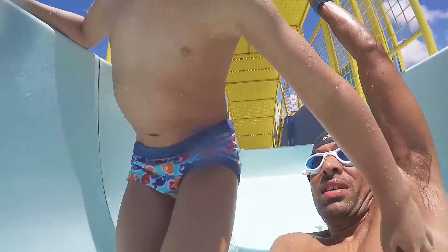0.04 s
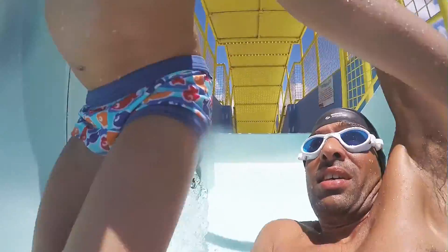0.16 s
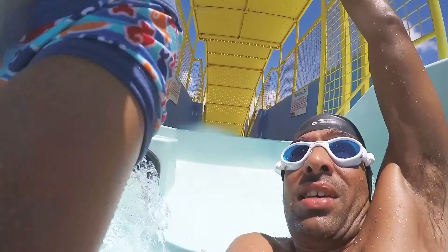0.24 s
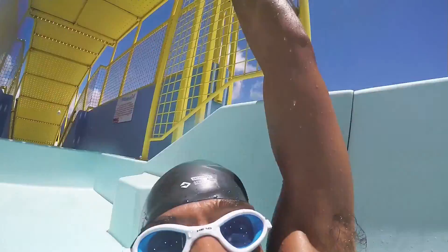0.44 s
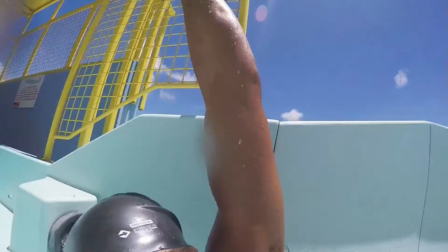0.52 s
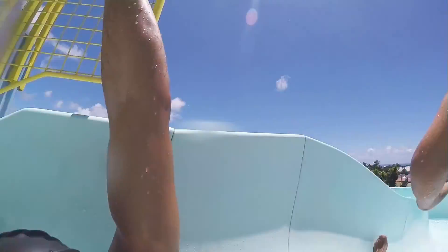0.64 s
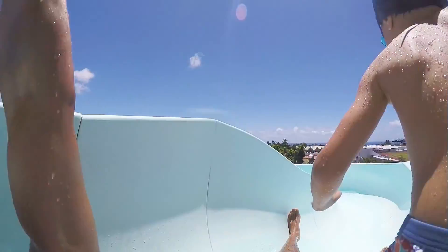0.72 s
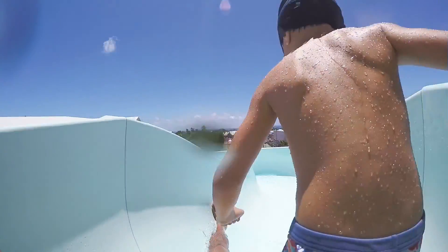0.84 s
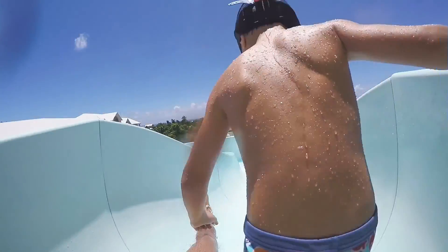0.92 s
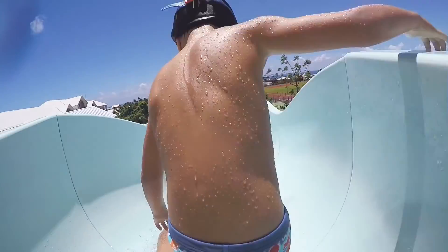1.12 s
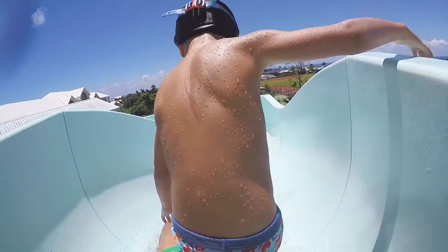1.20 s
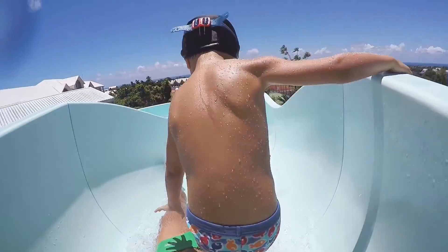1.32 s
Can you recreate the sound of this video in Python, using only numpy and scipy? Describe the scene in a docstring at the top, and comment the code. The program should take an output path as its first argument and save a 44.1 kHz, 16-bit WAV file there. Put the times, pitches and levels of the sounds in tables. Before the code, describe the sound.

Water gushes down an outdoor plastic slide, close to a carried microphone. From 0 s, spray hisses and patters over soft low rumble and small jolts. Around 0.3 s one deep, dull thump lands. The bubbling stream then comes forward, with rapid mid-pitched plops, strongest near 0.75 s, and a churning swell around 0.6-1.0 s. Small splashes and gurgles continue as it eases until about 1.35 s.

```python
"""Water gushes from a pipe down an open plastic slide, heard from a camera carried by a rider.
First spray and fizz from the inlet: random drop clicks, ringing bubbles and noise, over filtered-noise air rumble.
Swept-sine jolts shake the camera, with one deep thump early on; then, as it turns down the chute,
the stream comes forward: a cloud of ringing bubbles, with close plops, small splashes and gurgles,
and a churn of like bubbles that swells and fades."""
import sys
import numpy as np
from scipy import signal
from scipy.fft import rfft, irfft, next_fast_len
from scipy.io import wavfile

SR = 44100
rng = np.random.default_rng(int(sys.argv[2]) if len(sys.argv) > 2 else 0)


def digitize_waveform(pressure):
    """Quantize a signal to 16-bit integers and store it at the path in sys.argv[1].

    Rows of a 2-D input are taken as channels; values are limited to [-1, 1].
    """
    field = np.atleast_2d(pressure).T
    bounded = np.clip(field, -1, 1)
    quanta = np.round(bounded * 32767).astype(np.int16)
    wavfile.write(sys.argv[1], SR, quanta)


N = 59535


def undb(db):
    """Decibels to gain."""
    return 10 ** (np.asarray(db) / 20)


def unit(x):
    """Scale to rms 1."""
    return x / np.sqrt(np.mean(x ** 2))


def curve(rows):
    """Gain over time from (time [s], level [dB]) rows."""
    time_s, level_db = np.array(rows).T
    return undb(np.interp(np.arange(N) / SR, time_s, level_db))


def colour(x, rows):
    """Minimum-phase filter through (frequency [Hz], gain [dB]) rows; output rms 1."""
    hz, db = np.array(rows).T
    size = 2 * next_fast_len(N)
    bin_hz = np.maximum(np.arange(size // 2 + 1) * SR / size, 1)
    log_gain = np.log(undb(np.interp(np.log(bin_hz), np.log(hz), db)))
    # fold the cepstrum onto positive time: causal response
    cepstrum = irfft(log_gain)
    cepstrum[1:size // 2] *= 2
    cepstrum[size // 2 + 1:] = 0
    response = np.exp(rfft(cepstrum))
    return unit(irfft(rfft(x, size) * response)[:N])


def scaled(rows, centre_hz):
    """Spectrum rows with frequency multiples turned into Hz."""
    return [(multiple * centre_hz, db) for multiple, db in rows]


def walk(rate_hz):
    """Random line through `rate_hz` new values a second; rms 1."""
    return unit(np.interp(np.arange(N) / SR * rate_hz, np.arange(N), rng.standard_normal(N)))


def burst(start_s, length_s):
    """Envelope from `start_s`, peaking at 1 after half of `length_s`, then dying away."""
    u = np.maximum(np.arange(N) / SR - start_s, 0) / (length_s / 2)
    return u ** 2 * np.exp(2 * (1 - u))


def sizes(chance, spread_db):
    """Grain gains from uniform chance: many small, a few large."""
    return undb(-spread_db * np.log(np.maximum(chance, .02)))


def bubbles(rate_per_s, lo_hz, hi_hz, cycles, spread_db, glide=0.0046):
    """Cloud of decaying rings, each rising in pitch; roughly even in energy over frequency."""
    out = np.zeros(N)
    for when, pitch, size in rng.random((int(rate_per_s * N / SR), 3)):
        hz = lo_hz + (hi_hz - lo_hz) * pitch ** 2
        i = int(when * N)
        length = min(int(np.log(100) * cycles * SR / hz), N - i)  # down to -40 dB
        turns = np.arange(length) * hz / SR
        ring = np.exp(-turns / cycles) * np.sin(2 * np.pi * turns * (1 + glide * turns / cycles))
        out[i:i + length] += hz ** .75 * sizes(size, spread_db) * ring
    return unit(out)


# inlet spray filter: (frequency [Hz], gain [dB])
GUSH_SPECTRUM = [(88, -47), (150, -9), (257, -2), (343, -7), (535, -1.5), (601, -7), (728, -9), (818, -12),
                 (991, -3), (1670, -8.5), (2450, 1.5), (3150, -4.5), (3600, -2), (4050, -8), (5300, -2.5),
                 (6060, -16.5), (7640, -13.5), (9270, -21), (15000, -31)]
# inlet spray: (time [s], level [dB])
GUSH_LEVEL = [(0, -35), (.06, -40.5), (.15, -36.5), (.28, -38.5), (.335, -36.5), (.38, -39), (.55, -41),
              (.75, -41), (1.0, -40.5), (1.35, -41.5)]
DROPS_PER_S, DROP_SPREAD_DB = 6000, 2.5
FIZZ_DB, GUSH_WASH_DB = -4, -3.5  # relative to drops
GUSH_FLUTTER_DB = 1.0  # rms


def gush():
    """The jet breaks into drops that patter on the plastic, with fizz and a wash of spray."""
    hit, size = rng.random((2, N))
    signs = rng.choice([-1, 1], N)
    drops = unit((hit < DROPS_PER_S / SR) * sizes(size, DROP_SPREAD_DB) * signs)
    fizz = bubbles(5000, lo_hz=1505.0, hi_hz=14155, cycles=16.7, spread_db=3.5)
    wash = rng.standard_normal(N)
    spray = drops + undb(FIZZ_DB) * fizz + undb(GUSH_WASH_DB) * wash
    flutter = undb(GUSH_FLUTTER_DB * walk(60.47))
    return colour(spray, GUSH_SPECTRUM) * curve(GUSH_LEVEL) * flutter


# chute stream filter: (frequency [Hz], gain [dB])
STREAM_SPECTRUM = [(150, -18), (300, -22.5), (500, -17), (750, -12), (1100, -9), (1400, -4.5), (1600, -8.5),
                   (1880, -0.5), (2080, -4.5), (2350, -5), (2850, -22), (3400, -10.5), (3900, -8.5),
                   (4250, -21.5), (4650, -11.5), (5300, -35), (5900, -21), (7200, -22), (8500, -32),
                   (9600, -27), (11500, -37), (15000, -28)]
# chute stream: (time [s], level [dB])
STREAM_LEVEL = [(0, -42.5), (.26, -44), (.33, -36.5), (.42, -37.5), (.52, -37.5), (.6, -37), (.73, -37),
                (.78, -37), (.81, -34.5), (.845, -40.5), (.88, -35.5), (.98, -37.5), (1.07, -39),
                (1.125, -34.5), (1.18, -38), (1.22, -37), (1.35, -39.5)]
BUBBLES_PER_S, BUBBLE_SPREAD_DB, BUBBLE_CYCLES = 4500, 1, 5.8
STREAM_WASH_DB = -7  # relative to bubbles
STREAM_FLUTTER_DB = 0.18  # rms


def stream():
    """Water tumbles down the chute and folds air into ringing bubbles, over a noise wash."""
    cloud = bubbles(BUBBLES_PER_S, lo_hz=350.8, hi_hz=13165, cycles=BUBBLE_CYCLES,
                    spread_db=BUBBLE_SPREAD_DB)
    water = cloud + undb(STREAM_WASH_DB) * rng.standard_normal(N)
    flutter = undb(STREAM_FLUTTER_DB * walk(51.1))
    return colour(water, STREAM_SPECTRUM) * curve(STREAM_LEVEL) * flutter


# close bubbles: (start [s], starting pitch [Hz], envelope peak [dB], decay [s])
PLOPS = [(.3165, 2420, -27, 0.00099), (.3378, 2580, -25.5, 0.0012), (.3869, 1700, -25.5, .002),
         (.452, 1310, -30.5, 0.0025), (.4768, 1930, -24, 0.0012), (.499, 1606, -30.5, 0.0039),
         (.523, 1750, -33, 0.0018), (.5312, 1960, -26, 0.0013), (.553, 1730, -32, 0.002),
         (.673, 1900, -33, .0025), (.6925, 1990, -31, 0.0024), (0.7138, 1800, -24.5, 0.0026),
         (.7368, 1900, -28, 0.00089), (.7509, 1770, -16.5, .0011), (.778, 1820, -35, 0.0014),
         (.8018, 2110, -26.5, 0.0012), (.811, 1390, -31, 0.0051), (.852, 1890, -31.5, 0.0028),
         (.8805, 1430, -25, 0.0024), (.8875, 1780, -25, 0.0019), (.938, 2160, -28.5, .0035),
         (.961, 2300, -30, 0.0019), (.9828, 2430, -29, 0.002), (1.0, 2160, -31, 0.0018),
         (1.015, 580, -36, 0.0053), (1.151, 1310, -33.5, 0.0031)]
PLOP_RISE_SHARE = .6  # rise time / decay time
PLOP_CHIRP_PER_S = 6  # phase stretch; pitch rises at twice this rate


def plops():
    """Single bubbles near the microphone ring for a few cycles; longer rings swell more slowly."""
    out = np.zeros(N)
    for start_s, hz, db, decay_s in PLOPS:
        age = np.maximum(np.arange(N) / SR - start_s, 0)
        swell = 1 - np.exp(-(age / (PLOP_RISE_SHARE * decay_s)) ** 2)
        env = swell * np.exp(-age / decay_s)
        ring = np.sin(2 * np.pi * hz * age * (1 + PLOP_CHIRP_PER_S * age))
        out += undb(db) * env / env.max() * ring
    return out


# churning water beside the camera: (time [s], centre [Hz], level [dB])
CHURN = [(0.299, 1803, -56), (.39, 1755, -49), (.49, 1800, -59), (.54, 1834, -45), (.585, 1916, -46),
         (.63, 1862, -41.5), (.70, 1937, -39), (0.749, 1865, -36), (0.799, 1955, -40), (.89, 1819, -43),
         (.939, 2181, -41.5), (1.02, 2247, -41), (1.07, 2074, -48), (1.139, 1648, -54), (1.229, 2110, -52),
         (1.35, 1917, -48)]
CHURN_WIDTH_HZ, CHURN_PER_S = 400, 450
CHURN_WANDER, CHURN_WANDER_HZ = .04, 45  # rms share of pitch, new values a second


def churn():
    """A crowd of bubbles of like size rings together; pitch wanders as the flow changes."""
    time_s, centre_hz, level_db = np.array(CHURN).T
    hit, angle = rng.random((2, N))
    births = (hit < CHURN_PER_S / SR) * np.exp(2j * np.pi * angle)
    # low-pass at half width, then shift up to the centre pitch
    lowpass = signal.butter(2, CHURN_WIDTH_HZ / 2, fs=SR, output="sos")
    rings = signal.sosfilt(lowpass, births)
    pitch_hz = np.interp(np.arange(N) / SR, time_s, centre_hz)
    pitch_hz = pitch_hz * (1 + CHURN_WANDER * walk(CHURN_WANDER_HZ))
    carrier = np.exp(2j * np.pi * np.cumsum(pitch_hz) / SR)
    return unit(np.real(rings * carrier)) * curve(list(zip(time_s, level_db)))


# small splashes: (start [s], length [s], brightest frequency [Hz], level [dB])
SPLASHES = [(0.23, .01, 7200, -43), (0.335, 0.014, 2800, -40), (0.439, 0.014, 8600, -46.5),
            (.527, .01, 7850, -46.5), (.799, 0.012, 7600, -47), (0.863, 0.0073, 7500, -45),
            (0.928, .02, 7800, -46.5), (0.967, 0.039, 3870, -40), (1.05, .0045, 4300, -35),
            (1.089, 0.0087, 8300, -48), (1.107, 0.011, 5170, -40), (1.2, .017, 4530, -41.5),
            (1.276, 0.0033, 3500, -30.5), (1.324, .02, 7700, -47)]
# splash filter: (multiple of brightest frequency [1], gain [dB])
SPLASH_SPECTRUM = [(.1, -6.5), (.35, -8.5), (.7, -8.5), (1.0, 0), (1.25, -8.5), (1.5, -17), (2.0, -17),
                   (2.8, -30), (4.0, -34)]


def splashes():
    """Brief showers of fine droplets: filtered noise of uneven grain size."""
    out = np.zeros(N)
    for start_s, length_s, hz, db in SPLASHES:
        droplets = rng.standard_normal(N) * undb(2 * rng.standard_normal(N))
        out += undb(db) * burst(start_s, length_s) * colour(droplets, scaled(SPLASH_SPECTRUM, hz))
    return out


# gurgles of pushed water: (start [s], length [s], centre [Hz], level [dB])
GURGLES = [(.719, 0.013, 794, -41.5), (0.731, 0.02, 226, -44.5), (0.736, 0.03, 507, -43),
           (0.874, .018, 1000, -42), (1.086, 0.01, 790, -40.5), (1.11, 0.02, 1300, -43),
           (1.314, 0.013, 794, -42.5)]
# gurgle filter: (multiple of centre [1], gain [dB])
GURGLE_SPECTRUM = [(.1, -45), (.4, -21), (.75, -3.5), (1.0, 6), (1.35, -9.5), (2.6, -18), (8.0, -70)]


def gurgles():
    """Larger pockets of air churn briefly in the stream: bursts of band noise."""
    out = np.zeros(N)
    for start_s, length_s, hz, db in GURGLES:
        noise = rng.standard_normal(N)
        out += undb(db) * burst(start_s, length_s) * colour(noise, scaled(GURGLE_SPECTRUM, hz))
    return out


# camera jolts: (start [s], length [s], starting pitch [Hz], envelope peak [dB])
JOLTS = [(0.01, 0.029, 43.3, -33), (0.106, 0.033, 37.84, -27), (.203, 0.056, 29.2, -16.5),
         (0.2705, 0.09, 36.1, -6), (0.395, 0.082, 23.3, -20.5), (0.514, 0.066, 25.5, -21.5),
         (0.603, 0.081, 37.8, -20.5), (0.697, 0.092, 32.3, -29), (0.797, .034, 29.5, -30.5),
         (1.073, 0.15, 23.76, -28.5), (1.211, 0.083, 24.73, -25)]
JOLT_SAG = 0.305  # pitch falls by twice this share
JOLT_SKEW, JOLT_ROUND = 0.67, 1.28  # envelope exponents: early peak, soft ends


def jolts():
    """Each jolt is a deep swing of pressure that slows as it ends."""
    t = np.arange(N) / SR
    out = np.zeros(N)
    for start_s, length_s, hz, db in JOLTS:
        u = np.clip((t - start_s) / length_s, 0, 1)
        env = np.abs(np.sin(np.pi * u ** JOLT_SKEW)) ** JOLT_ROUND
        out += undb(db) * env * np.sin(2 * np.pi * hz * length_s * u * (1 - JOLT_SAG * u))
    return out


# soft bumps on the housing: (start [s], envelope peak [dB])
BUMPS = [(0.018, -31.5), (0.171, -33), (0.274, -23.5), (0.304, -28), (0.481, -35), (0.553, -37.5),
         (0.608, -27.5)]
BUMP_HZ, BUMP_S = 63.7, 0.014


def bumps():
    """The housing is bumped: short low sine bursts."""
    t = np.arange(N) / SR
    out = np.zeros(N)
    for start_s, db in BUMPS:
        out += undb(db) * burst(start_s, BUMP_S) * np.sin(2 * np.pi * BUMP_HZ * (t - start_s))
    return out


# dull rubbing of the housing: (start [s], length [s], level [dB])
RUBS = [(.272, .046, -40), (.606, .012, -37.5)]
# rub filter: (frequency [Hz], gain [dB])
RUB_SPECTRUM = [(60, 1), (130, 1.5), (250, -3), (400, -19.5), (900, -29), (4000, -83)]


def rubs():
    """The housing rubs during two jolts: bursts of dull noise."""
    envelope = sum(undb(db) * burst(start_s, length_s) for start_s, length_s, db in RUBS)
    return colour(rng.standard_normal(N), RUB_SPECTRUM) * envelope


# air rumble filter: (frequency [Hz], gain [dB])
AIR_SPECTRUM = [(8, -8.5), (20, 2), (35, 1.5), (60, -8), (90, -18), (140, -25.5), (200, -28), (300, -38),
                (600, -66.5)]
# air rumble: (time [s], level [dB])
AIR_LEVEL = [(0, -35), (.5, -36), (.75, -37.5), (.95, -39), (1.35, -36)]


def air():
    """Air rumbles on the microphone: low-frequency noise."""
    return curve(AIR_LEVEL) * colour(rng.standard_normal(N), AIR_SPECTRUM)


def scene():
    """Water all around a jostled camera, mono."""
    water = gush() + stream() + plops() + churn() + splashes() + gurgles()
    handling = jolts() + bumps() + rubs()
    return (water + handling + air())[None]


TOP_HZ = 15300


def record(dry):
    """The camera cuts the top of the treble: steep elliptic low-pass."""
    return signal.sosfilt(signal.ellip(10, .2, 80, TOP_HZ, fs=SR, output="sos"), dry)


dry = scene()
out = record(dry)
digitize_waveform(out)
```